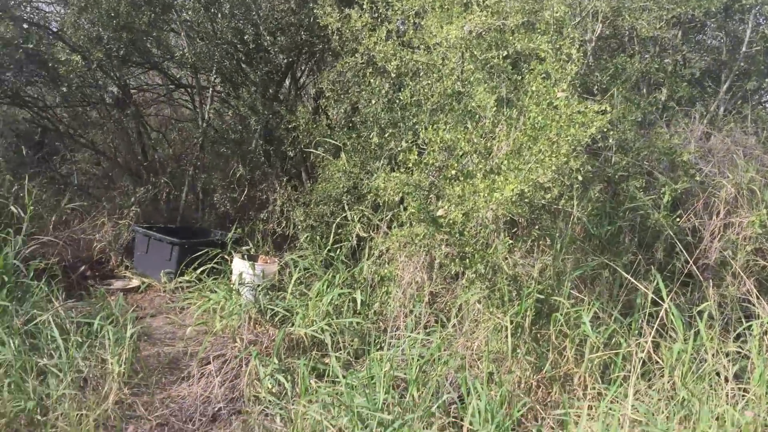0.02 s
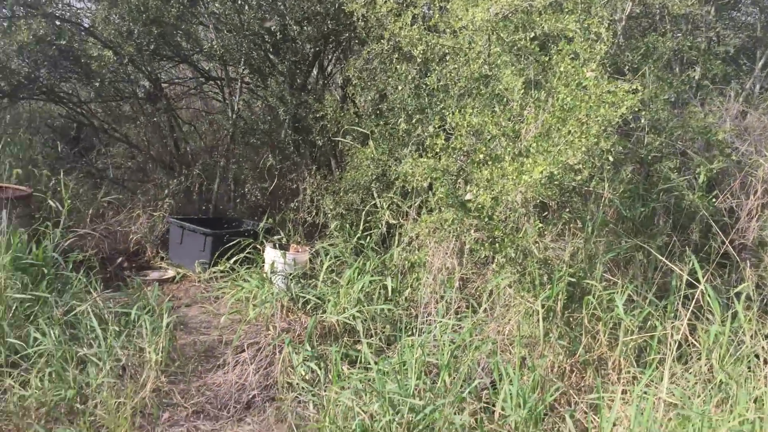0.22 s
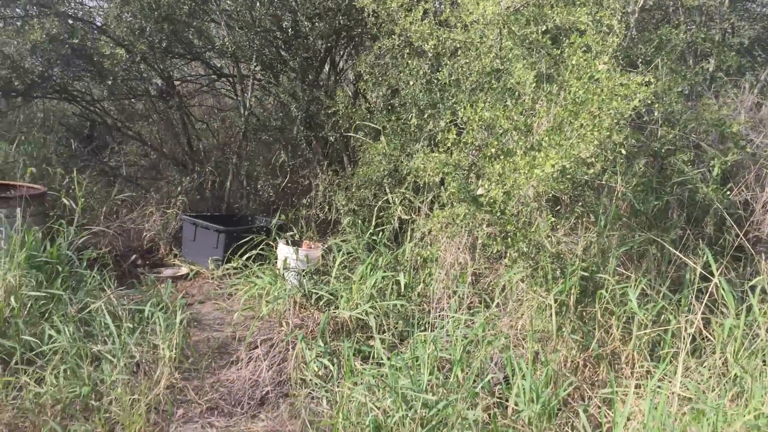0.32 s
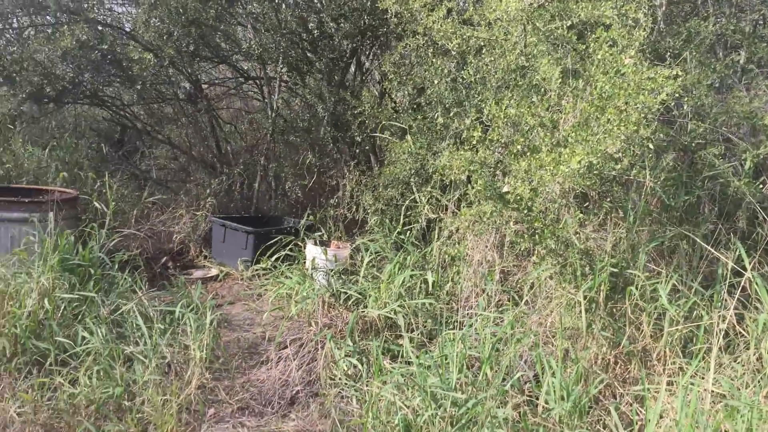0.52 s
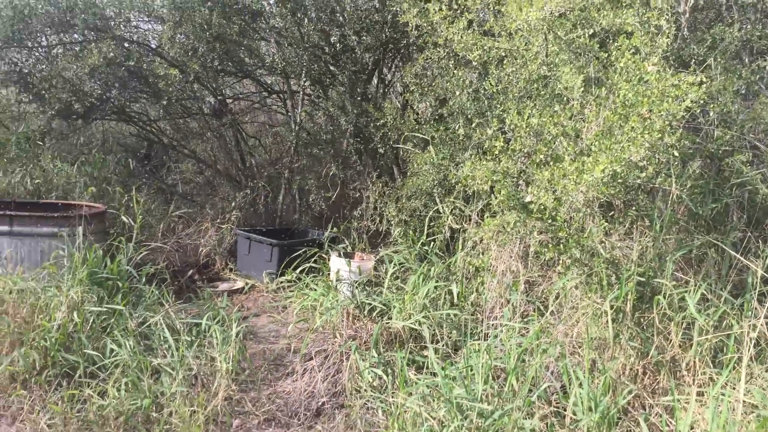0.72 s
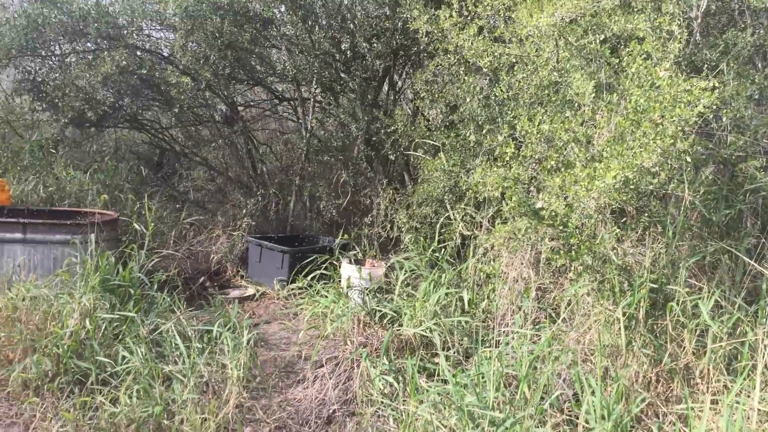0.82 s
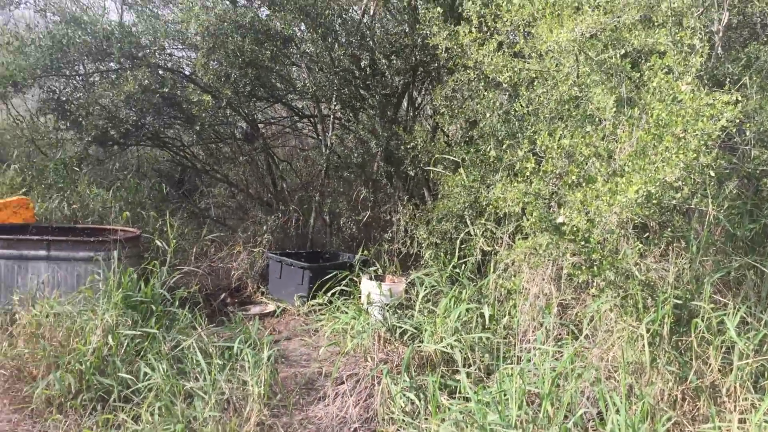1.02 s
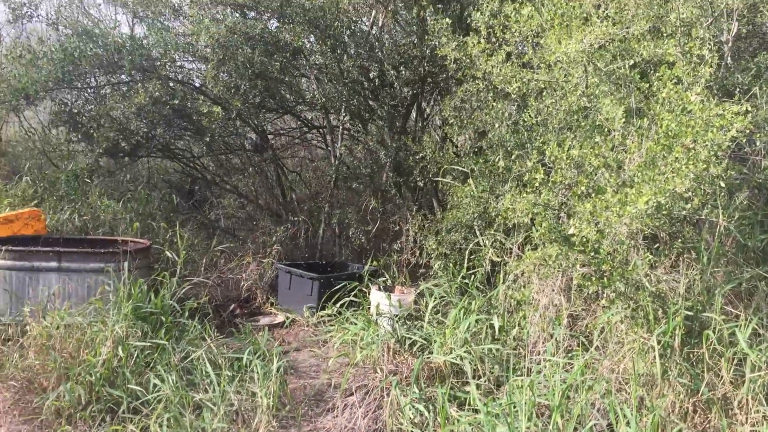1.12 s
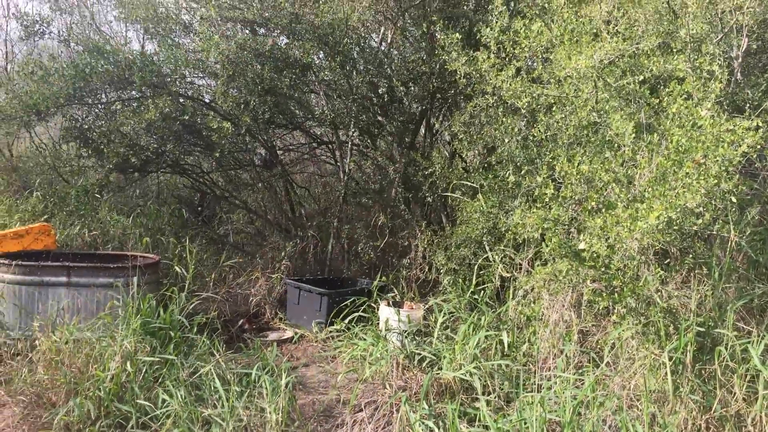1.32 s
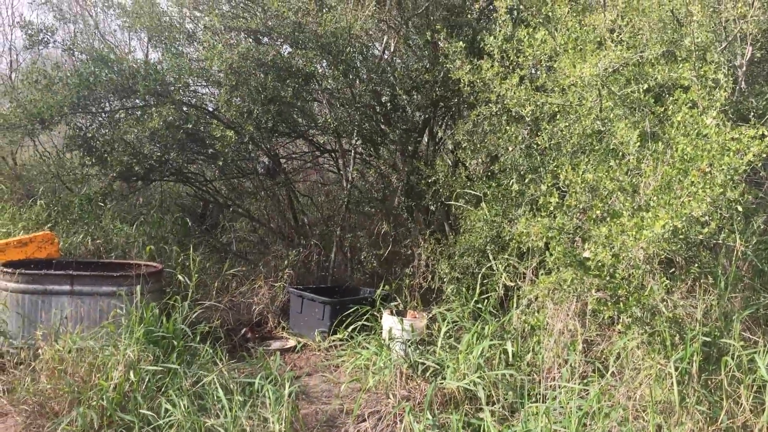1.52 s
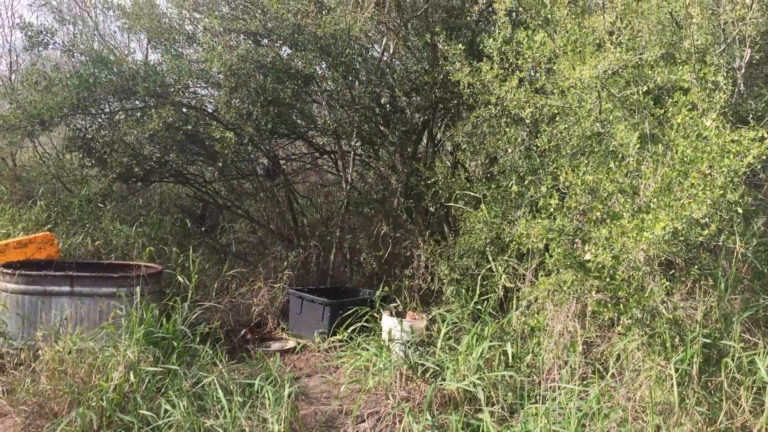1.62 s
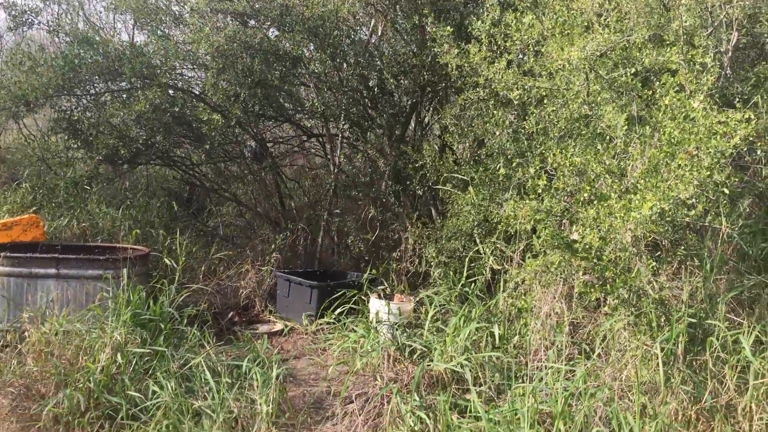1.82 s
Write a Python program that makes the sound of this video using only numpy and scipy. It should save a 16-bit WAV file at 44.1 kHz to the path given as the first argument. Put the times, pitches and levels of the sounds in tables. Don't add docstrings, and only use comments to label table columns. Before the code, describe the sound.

A steel tool bangs a large sheet-metal tank five times, harsh ringing clangs in quiet brush

```python
import sys
import numpy as np
from scipy import signal
from scipy.fft import rfft, irfft
from scipy.io import wavfile
from scipy.ndimage import uniform_filter1d, map_coordinates

SR = 44100
rng = np.random.default_rng(int(sys.argv[2]) if len(sys.argv) > 2 else 0)


def invert_db(x):
    u = np.asarray(x, float) / 20
    return 10 ** u


def store_wav(level_fs):
    pcm = np.round(np.clip(np.atleast_2d(level_fs), -1, 1) * 32767)
    wavfile.write(sys.argv[1], SR, pcm.T.astype(np.int16))


N = 83790

# t/s, level/dB
BLOWS = [
    (.204, 3),
    (.535, 3),
    (.878, 3.5),
    (1.227, 2.5),
    (1.571, 2),
]
# t/s, level/dB
EARLIER_BLOWS = [
    (-0.48, 0),
    (-0.135, 0.5),
]
# f/Hz, level/dB per Hz
LEAD_SPECTRUM = [(1500, 6), (3000, 5), (6000, -10.5), (10000, -21), (15000, -22), (17000, -30)]
# f/Hz, level/dB per Hz
CRACK_SPECTRUM = [(1000, -37.5), (4800, 8), (9000, -5.5), (14800, -7.5), (17000, -6)]
CLANG_HZ = [545, 724, 797, 941, 1060, 1182, 1277, 1375, 1407, 1481, 1557, 1971, 2041, 2308]
# level/dB, T60/s
CLANG_DECAY = [(-15, .15), (-1, 0.23), (-5, 0.23), (-3, 0.39), (-11, 0.37), (-1.5, 0.2), (-5.5, 0.18),
               (-0.5, 0.05), (-13, 0.44), (-5.5, 0.34), (0.5, 0.12), (-2, 0.067), (-2.5, 0.24), (-23, 0.28)]
BRIGHT_HZ = [2540, 2663, 2770, 2915, 3045, 3645, 3910, 4213, 4425, 4632, 5076, 5370, 5900, 7250]
# level/dB, T60/s
BRIGHT_DECAY = [(-4.5, .16), (-2, 0.082), (-10.5, 0.16), (-7, 0.19), (-7.5, 0.2), (-9, 0.17), (-13, 0.18),
                (-19.5, 0.04), (-23, .12), (-7, 0.18), (-5.5, 0.033), (-7, 0.075), (-9.5, 0.082),
                (-18, 0.18)]
# f/Hz, level/dB per Hz
DENSE_SPECTRUM = [(150, -17), (600, -5), (1600, -3.5), (2900, 1.5), (5000, -1), (10500, -14),
                  (14800, -13.5), (17000, -26.5)]
# f/Hz, T60/s
DENSE_T60 = [(200, 0.076), (500, 0.28), (1200, 0.4), (3000, 0.17), (6000, 0.14), (10000, 0.12),
             (16000, 0.094)]
TOOL_HZ = [1607, 1637, 1703, 1765]
# level/dB, T60/s
TOOL_DECAY = [(-9, .6), (-4, 1.2), (-4, .4), (-15, .25)]
HUM_HZ = [240, 447, 704, 750, 803, 953, 1016, 1062, 1226, 1279, 1370, 1487, 1628, 1790]
# level/dB, T60/s
HUM_DECAY = [(-20, 1.5), (-7.5, 0.96), (-4.5, 0.96), (1.5, 1.5), (-4, 1.3), (1.5, 0.32), (-1.5, 0.92),
             (2, 0.75), (-6, 0.96), (-15.5, 2.1), (-14.5, 2.4), (-8, 2.24), (0, 0.73), (-2, 0.52)]
FAINT_HUM_HZ = [122, 168, 220, 330, 515, 550, 2046, 2150, 2309, 2573, 2885, 3100, 3700, 4630]
# level/dB, T60/s
FAINT_HUM_DECAY = [(-19.5, 2.1), (-18.5, 2.4), (-16.5, 4.1), (-15, 1.5), (-20.5, 3.5), (-11.5, 0.78),
                   (-18, 1.4), (-29, 0.41), (-8, 0.17), (-13.5, .8), (-17.5, 1.2), (-15, 0.65),
                   (-22.5, 0.45), (-21.5, .7)]
# f/Hz, level/dB per Hz
WASH_SPECTRUM = [(88, -45.5), (150, -8.5), (611, -29), (751, -5.5), (876, -19.5), (1490, -0.5),
                 (1890, -25.5), (9000, -43), (11700, -88), (19800, -120)]
# f/Hz, T60/s
WASH_T60 = [(300, 0.92), (1500, 0.7), (5000, .5)]
# f/Hz, level/dB per Hz
FLOOR_SPECTRUM = [(20, -19), (60, -3), (200, -6.5), (600, -12), (1500, -9), (3500, -27), (10000, -44),
                  (16000, -50.5)]
# t/s, level/dB
BREEZE = [(0, 3), (.5, 0.5), (.7, -1), (1.2, 0.5), (1.5, 1.5), (1.9, -0.5)]
# t/s, level/dB
DRONE = [(0, -43), (.55, -40.5), (.75, -46.5), (1.9, -55.5)]
# t/s, duration/s, f/Hz, level/dB
CALLS = [(.085, .1, 12700, -68), (.11, .07, 13400, -72), (.3, .12, 12700, -68), (1.5, .06, 13100, -72),
         (1.71, .04, 12700, -67), (1.79, .11, 12700, -71), (1.83, .05, 13100, -65), (.03, .025, 7200, -64),
         (.475, .025, 7200, -61), (1.71, .03, 7200, -65), (.085, .045, 3200, -53), (1.49, .03, 2950, -54),
         (1.885, .03, 2900, -48), (1.48, .04, 4700, -62), (.09, .04, 3700, -60)]
# t/s, duration/s, level/dB
RUSTLES = [
    (.065, .03, -58),
    (1.475, .045, -51),
    (.47, .04, -55),
]
# f/Hz, level/dB per Hz
RUSTLE_SPECTRUM = [(1500, -25), (3000, 2.5), (7000, -4.5), (10000, -17), (16000, -17)]

NEXT_BLOW_S = 1.909
ONSET_S = .0005
RISE_S = .0012
VARY_DB, VARY_TURN_RAD = 1.5, .56


def unit(x):
    return x / np.sqrt(np.mean(x ** 2) + 1e-20)


def along(points, hz):
    f, value = np.transpose(points)
    return np.interp(np.log(hz + 1), np.log(f + 1), value)


def noise(spectrum, size):
    white = rfft(rng.standard_normal(size))
    gain = invert_db(along(spectrum, np.fft.rfftfreq(size, 1 / SR)))
    return unit(irfft(white * gain, size))


def add(out, s, x):
    i = round(s * SR)
    x = x[max(-i, 0):max(len(out) - i, 0)]
    out[max(i, 0):][:len(x)] += x


def ring(modes, size, count):
    hz, db, t60 = np.transpose(modes)
    t = np.arange(size) / SR
    basis = np.exp(np.outer(2j * np.pi * hz - np.log(1000) / np.abs(t60), t).astype(np.complex64))
    phase = rng.uniform(0, 2 * np.pi, len(hz))
    vary = rng.standard_normal((count, 2, len(hz)))
    turn = np.exp(1j * (phase + VARY_TURN_RAD * vary[:, 1]))
    weight = invert_db(db + VARY_DB * vary[:, 0]) * turn
    return (weight.astype(np.complex64) @ basis).imag * (1 - np.exp(-t / RISE_S))


def hum(size, count):
    modes = np.c_[HUM_HZ + FAINT_HUM_HZ, HUM_DECAY + FAINT_HUM_DECAY]
    return invert_db(-27) * ring(modes, size, count)


def scatter(spectrum, t60s, count, bend):
    lo, hi = spectrum[0][0], spectrum[-1][0]
    hz = lo + (hi - lo) * rng.random(count) ** bend
    spacing = ((hz - lo) / (hi - lo) + .00041) ** (1 - 1 / bend)
    db = along(spectrum, hz) + 10 * np.log10(spacing) + 3 * rng.standard_normal(count)
    db = db - 10 * np.log10(np.sum(invert_db(db) ** 2) / 2)
    t60 = along(t60s, hz) * invert_db(2 * rng.standard_normal(count))
    return np.transpose([hz, db, t60])


def shimmer(size, count):
    return invert_db(-36.5) * ring(scatter(WASH_SPECTRUM, WASH_T60, count=250, bend=2), size, count)


def lead_in(db):
    size = round(.021 * SR)
    before = np.arange(size)[::-1] / SR
    swell = 1 + invert_db(9) * np.exp(-before / .0023)
    rise = np.sqrt(np.linspace(.1, 1, size))
    return invert_db(db - 38.5) * noise(LEAD_SPECTRUM, size) * rise * swell


def crack(size):
    t = np.arange(size) / SR
    decay = invert_db(1.5 - 60 * t / .0087)
    return decay * noise(CRACK_SPECTRUM, size) * (1 - np.exp(-t / .0003))


def clang(size, count):
    t = np.arange(size) / SR
    contact_s, lift_s, lift_db = .022, .002, -8
    lift = invert_db(lift_db * np.clip((t - contact_s) / lift_s, 0, 1))
    low = ring(np.c_[CLANG_HZ, CLANG_DECAY], size, count)
    high = ring(np.c_[BRIGHT_HZ, BRIGHT_DECAY], size, count)
    return invert_db(-5.5) * (lift * low + high)


def dense(size, count):
    fresh = .4
    raw = rng.standard_normal((count + 1, size))
    mixed = np.sqrt(1 - fresh) * raw[0] + np.sqrt(fresh) * raw[1:]
    hz, t, z = signal.stft(mixed, SR, nperseg=512, noverlap=384)
    ragged = rng.standard_normal((2, len(hz)))
    gain = invert_db(along(DENSE_SPECTRUM, hz) + 1.8 * ragged[0])
    t60 = np.abs(along(DENSE_T60, hz) * invert_db(.7 * ragged[1]))
    fall_db = -60 * t / t60[:, None]
    z = z * unit(gain)[:, None] * (invert_db(fall_db) + invert_db(-22 + fall_db / 2.2))
    x = signal.istft(z, SR, nperseg=512, noverlap=384)[1][:, :size]
    return invert_db(-2) * x * (1 - np.exp(-np.arange(size) / SR / RISE_S))


def tool_tones(size, count):
    t = np.arange(size) / SR
    held_s, damp_t60 = .057, .05
    damp = invert_db(-60 * np.maximum(t - held_s, 0) / damp_t60)
    return invert_db(-2) * damp * ring(np.c_[TOOL_HZ, TOOL_DECAY], size, count)


def tank():
    blows = EARLIER_BLOWS + list(BLOWS)
    out, count, short = np.zeros(N), len(blows), SR // 3
    fast = clang(short, count) + dense(short, count) + tool_tones(short, count)
    fast = fast * np.cos(np.linspace(0, np.pi / 2, short))
    slow = hum(SR, count) + shimmer(SR, count)
    slow = slow * np.cos(np.linspace(0, np.pi / 2, SR))
    burst = crack(short)
    for (s, db), fast_blow, slow_blow in zip(blows, fast, slow):
        add(out, s - ONSET_S, invert_db(db) * (fast_blow + burst))
        add(out, s - ONSET_S, invert_db(db) * slow_blow)
    for s, db in blows + [(NEXT_BLOW_S, blows[-1][1])]:
        lead = lead_in(db)
        add(out, s - len(lead) / SR - ONSET_S, lead)
    return out


def brush():
    t = np.arange(N) / SR
    s, db = np.transpose(DRONE)
    knots = rng.standard_normal((2, 40))
    sway = map_coordinates(knots, [[np.zeros(N), np.ones(N)], [t * 8, t * 8]])
    drone = invert_db(np.interp(t, s, db) + 2 * sway[0]) * np.sin(2 * np.pi * 90 * t + .8 * sway[1])
    floor_db = -40.5 + np.interp(t, *np.transpose(BREEZE)) + 1.5 * sway[1]
    return invert_db(floor_db) * noise(FLOOR_SPECTRUM, N) + drone


def creatures():
    out = np.zeros(N)
    for s, length, hz, db in CALLS:
        t = np.arange(round(length * SR)) / SR
        wander = uniform_filter1d(rng.standard_normal((2, 6000)), 60, axis=1)[:, :len(t)]
        rough = .35 * np.sqrt(60) * wander
        envelope = invert_db(db + 8) * np.sin(np.pi * t / length) ** .6
        add(out, s, envelope * (1 + rough[0]) * np.sin(2 * np.pi * hz * t + rough[1]))
    return out


def rustles():
    out = np.zeros(N)
    for s, length, db in RUSTLES:
        x = noise(RUSTLE_SPECTRUM, 4096)[:round(length * SR)]
        add(out, s, invert_db(db) * np.hanning(len(x)) * x)
    return out


def scene():
    return (tank() + brush() + creatures() + rustles())[None]


def band_limit(x):
    return signal.sosfilt(signal.butter(12, 17090, fs=SR, output="sos"), x)


def record(dry):
    clip_top, clip_hardness = .79, 8
    x = invert_db(-7) * dry
    x = x / (1 + np.abs(x / clip_top) ** clip_hardness) ** (1 / clip_hardness)
    hz = np.fft.rfftfreq(N, 1 / SR)
    response = np.interp(hz, [0, 70, 15950, 16070, 17100], invert_db([-31, -1.5, 0, -27.5, -38.5]))
    mix = irfft(rfft(x) * response, N)
    return band_limit(mix)


dry = scene()
out = record(dry)
store_wav(out)
```